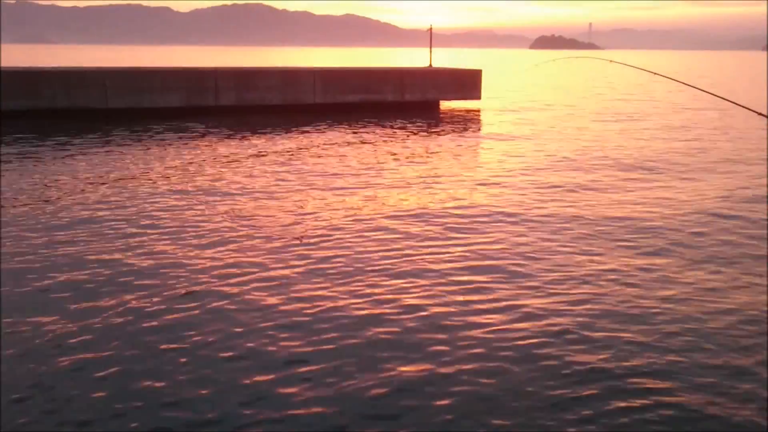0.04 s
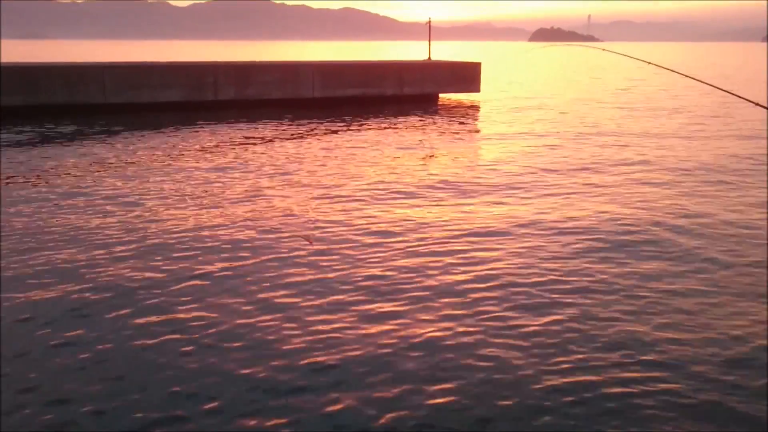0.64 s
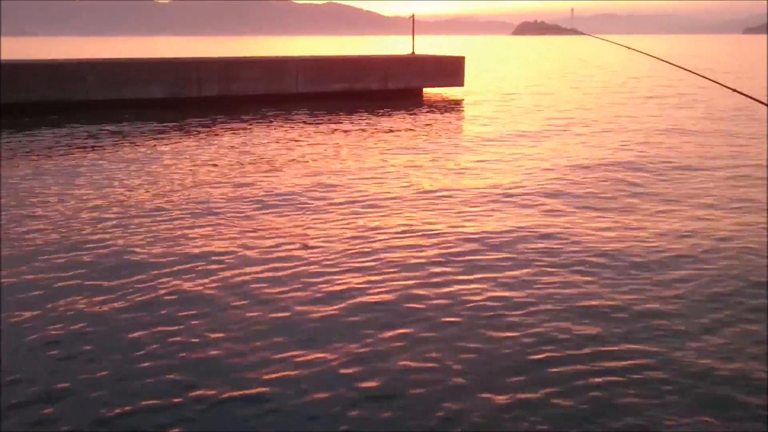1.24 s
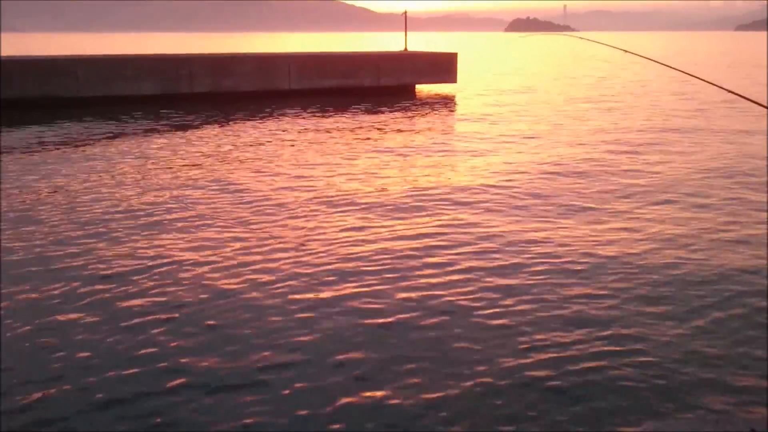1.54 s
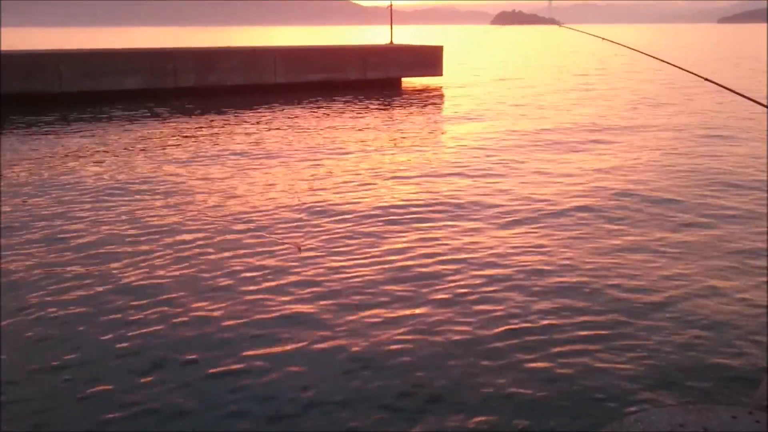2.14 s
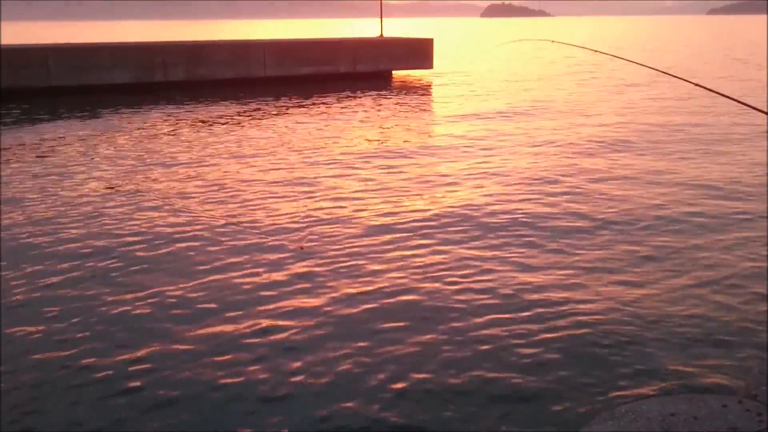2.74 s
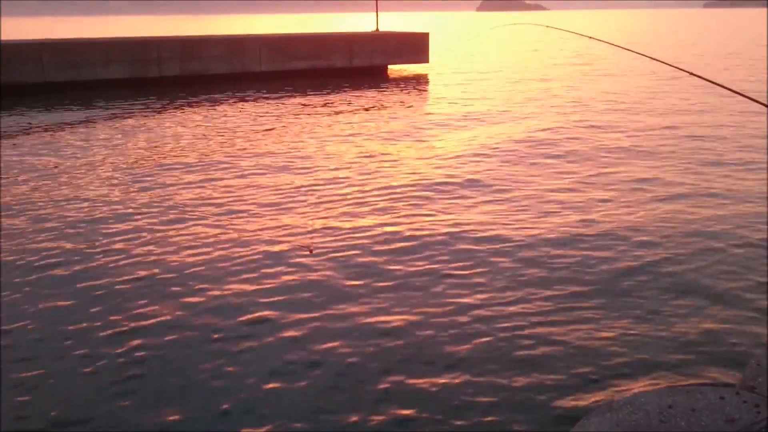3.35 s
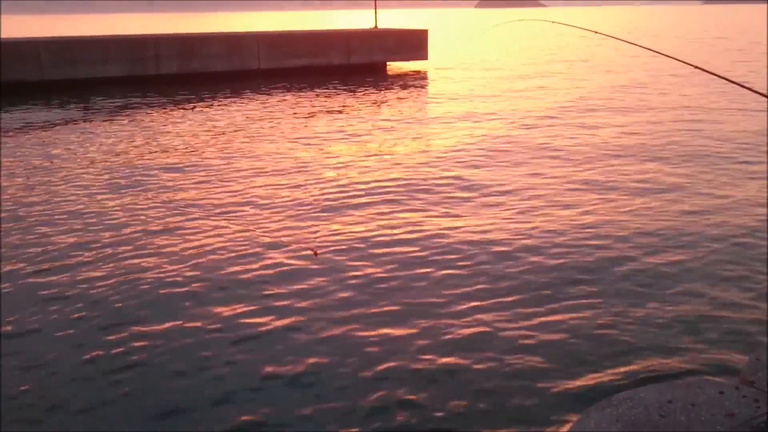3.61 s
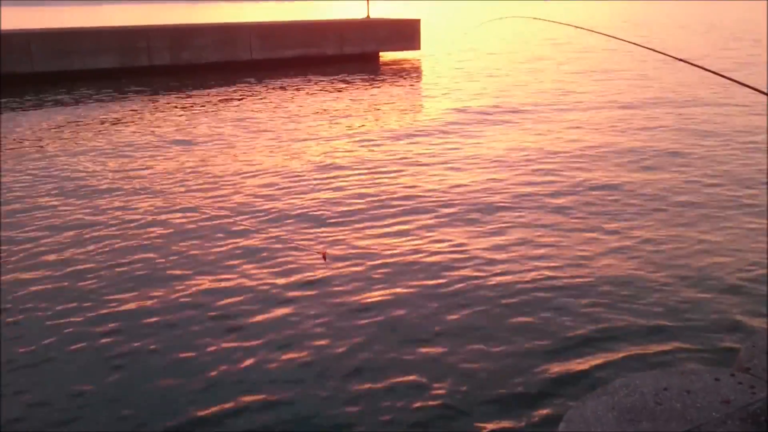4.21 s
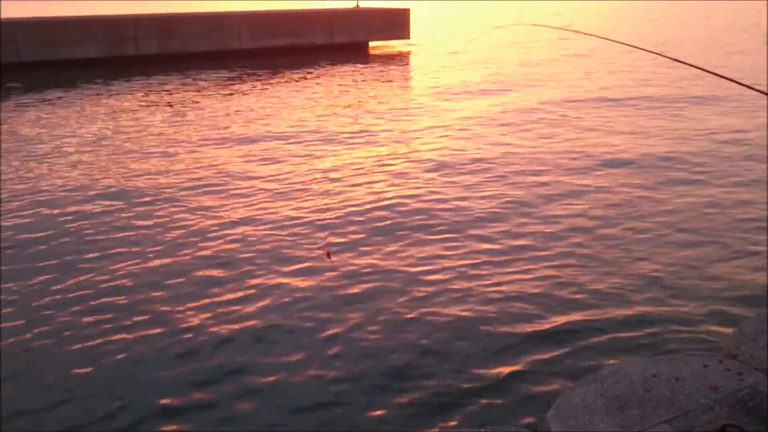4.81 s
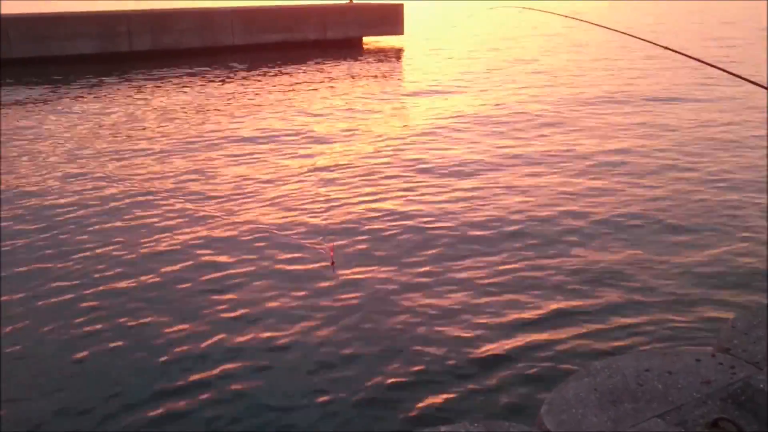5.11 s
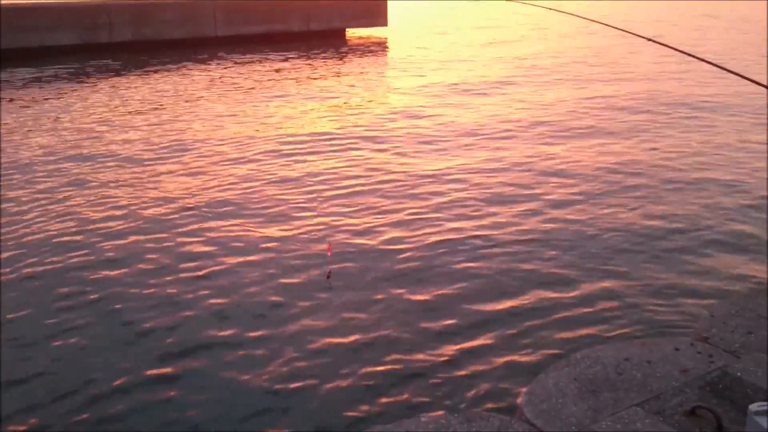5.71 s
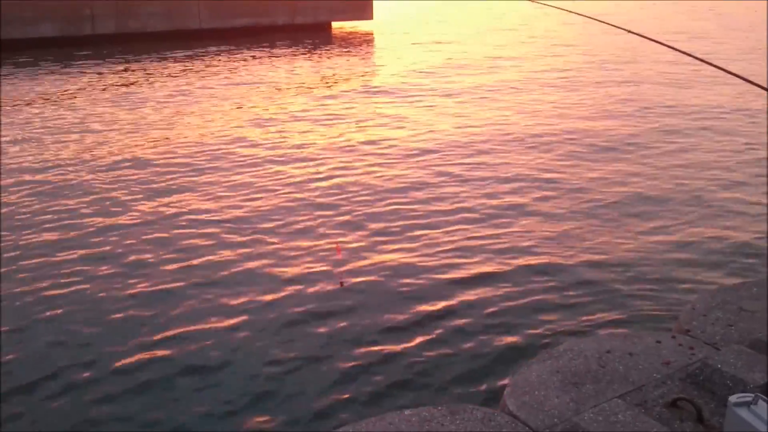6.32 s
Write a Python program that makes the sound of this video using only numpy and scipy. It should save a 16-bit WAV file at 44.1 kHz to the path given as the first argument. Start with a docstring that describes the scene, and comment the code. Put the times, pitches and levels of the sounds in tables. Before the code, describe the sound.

Close to the microphone, gentle waves slosh against a harbour wall in uneven bursts, throwing fine spray and leaving bubbly gurgles and single plops. The splashing swells at the start, eases, returns lightly, peaks a little past the middle and then calms. Underneath lie a soft harbour hush and low gusts on the microphone, while a distant engine and a few bird chirps are barely audible.

```python
"""Small waves lap against a concrete seawall: each lap traps a cloud of gulping bubbles and throws spray.
The water fizzes as it runs up the wall and gurgles a moment later as it drains, with single plops
and spits of droplets. Bubbles are damped, rising tones; spray and fizz are tiny ones over hiss.
Behind lie the hush of the harbour, the hum of a far engine, a few faint bird calls
and a low, gusting rumble, like wind on the microphone."""
import sys
import numpy as np
from scipy import signal
from scipy.fft import rfft, irfft, next_fast_len
from scipy.io import wavfile
from scipy.ndimage import uniform_filter1d, map_coordinates

SR = 44100
rng = np.random.default_rng(int(sys.argv[2]) if len(sys.argv) > 2 else 0)


def transcribe(signal):
    """Save signal, clipped to [-1, 1], as a 16-bit WAV file at the path in sys.argv[1]."""
    frames = np.atleast_2d(signal).T
    limited = np.clip(frames, -1, 1)
    pcm = np.round(limited * 32767).astype(np.int16)
    wavfile.write(sys.argv[1], SR, pcm)


N = 289296
DRAIN_LAG_S = 0.049  # the gurgle and the stray bubbles trail the fizz


def amp(db):
    return 10 ** (np.asarray(db) / 20)


def unit(x):
    """x at rms 1."""
    return x / np.sqrt(np.mean(x ** 2) + 1e-20)


def along(points, hz):
    """Read a curve of (f/Hz, value) points on a log frequency axis."""
    f, value = np.transpose(points)
    return np.interp(np.log(hz + 1), np.log(f + 1), value)


def wobble(rate):
    """A smooth random curve, rate knots a second."""
    knots = rng.standard_normal(int(N * rate / SR) + 4)
    return map_coordinates(knots, [np.arange(N) * rate / SR])


def filtered(x, response):
    """x through an EQ whose gain is response(hz)."""
    n = x.shape[-1]
    padded = next_fast_len(n + 4096)
    return irfft(rfft(x, padded) * response(np.fft.rfftfreq(padded, 1 / SR)), padded)[..., :n]


def coloured(x, spectrum):
    """x shaped by an EQ curve of (f/Hz, level/dB) points, at rms 1."""
    return unit(filtered(x, lambda hz: amp(along(spectrum, hz))))


def flow(lag_s):
    """How much water ran along the wall lag_s ago, in dB above the usual."""
    # swell and ebb of the water: t/s, level/dB
    tide = [(0, -55), (.51, -56.5), (.78, -52), (1.15, -60.5), (1.35, -66), (1.97, -63.5), (2.12, -60),
            (2.67, -58.5), (3.09, -67.5), (3.32, -60.5), (3.49, -59.5), (4.27, -53.5), (4.57, -53),
            (4.73, -56.5), (4.92, -65), (5.55, -64), (5.9, -61), (6.56, -62.5)]
    usual_db = -58
    return np.interp(np.arange(N) / SR - lag_s, *np.transpose(tide)) - usual_db


def burst(peak_s, rise, decay):
    """The samples around peak_s and an envelope that swells to its peak there, then dies away."""
    span = slice(max(int((peak_s - .15) * SR), 0), min(int((peak_s + .25) * SR), N))
    age = np.arange(span.start, span.stop) / SR - peak_s
    return span, np.where(age < 0, np.exp(-(age / rise) ** 2), np.exp(-np.abs(age) / decay))


def ring(t, hz, decay, glide):
    """A bubble as a complex damped tone with a soft attack; its pitch climbs as it nears the surface."""
    age = t / decay
    attack = 1 - np.exp(-(hz * t) ** 2)
    return attack * np.exp(2j * np.pi * hz * t * (1 + glide * age / 2) - age)


def bubbles(n, low_hz, high_hz, cycles, spread_db, count, size):
    """Bubble grains of size samples scattered over n samples, phase differing left to right; rms 1."""
    when, pitch, life, strength, phase = rng.random((count, 5)).T[:, :, None]
    hz = low_hz * (high_hz / low_hz) ** pitch
    decay = np.minimum(cycles * (.5 + life) / hz, size / SR / 4)
    gain = amp(-spread_db * np.log(0.17 + strength)) / np.sqrt(decay)
    tones = gain * ring(np.arange(size) / SR, hz, decay, glide=0.051)
    at = ((when * n).astype(int) + np.arange(size)) % n
    pair = [tones.imag, (tones * np.exp(2j * np.pi * phase)).imag]
    return unit(np.array([np.bincount(at.ravel(), channel.ravel(), n) for channel in pair]))


def patchy(x, patch_db, seconds, bins):
    """Bubbles of like size burst together: pitch regions a few bins wide swell and fade; rms 1."""
    spectra = signal.stft(x, nperseg=512)[2]
    frames = max(int(seconds * SR / 256), 2)
    patches = uniform_filter1d(rng.standard_normal(spectra.shape[1:]), bins, axis=0)
    patches = uniform_filter1d(patches, frames, axis=1)
    patches = uniform_filter1d(patches, 3, axis=0)
    return unit(signal.istft(spectra * amp(patch_db * unit(patches)), nperseg=512)[1][:, :N])


def crackle(spectrum, hiss_db, count):
    """Tiny ringing bubbles and droplets in clumps over a smooth hiss; rms 1."""
    pops = bubbles(N, 1100, 7000, cycles=5.9, spread_db=2.6, count=count, size=400)
    pops = unit(filtered(pops, np.sqrt))  # equal power per Hz
    froth = pops + amp(hiss_db) * rng.standard_normal((2, N))
    return coloured(patchy(froth, patch_db=2.8, seconds=.025, bins=7), spectrum)


def wall(x):
    """The concrete scatters a short, diffuse reflection."""
    # reverb time of the wall: f/Hz, t60/s
    t60 = [(200, 0.15), (2000, 0.22), (10000, 0.18)]
    hz, t, spectra = signal.stft(rng.standard_normal((2, SR // 3)), SR, nperseg=256)
    tail = signal.istft(spectra * amp(-60 * t / along(t60, hz)[:, None]), SR, nperseg=256)[1]
    return signal.fftconvolve(x, tail / np.linalg.norm(tail[0]), axes=1)[:, :N]


def splashes():
    """Wavelets collapse on the wall: air pockets gulp and spray flies, the finer the more water runs."""
    # wavelets: peak t/s, rise/s, gulp f/Hz, gulp level/dB, spray offset/dB
    laps = [(.02, 0.039, 2420, -57, 2.5), (.185, 0.0099, 930, -44.5, -11), (.254, 0.038, 516, -53, 3.5),
            (0.419, 0.003, 556, -49.5, 2), (.581, 0.0091, 1450, -36.5, -1), (0.643, 0.022, 1300, -43.5, 5),
            (.714, 0.005, 976, -46.5, 8.5), (.743, 0.0093, 2200, -41, 2.5), (.801, 0.033, 770, -48, 4),
            (.98, 0.028, 840, -48.5, -2), (2.025, 0.016, 540, -57.5, 7), (2.153, 0.022, 616, -49.5, -5.5),
            (2.299, 0.007, 1210, -46.5, -3.5), (2.439, .002, 850, -50, -12),
            (2.606, 0.0051, 1367, -49.5, 1.5), (2.681, 0.021, 2570, -49.5, 2.5),
            (2.744, 0.01, 500, -62, -7), (2.881, 0.02, 2310, -56.5, -1), (3.42, 0.031, 3050, -57.5, -1),
            (3.67, 0.097, 1750, -58, -1.5), (3.898, 0.0066, 2310, -48, -1), (3.976, 0.017, 488, -44, 2),
            (4.251, 0.0068, 690, -41.5, 2), (4.4, 0.043, 700, -47.5, 3.5),
            (4.488, 0.011, 1810, -41.5, -1.5), (4.541, 0.025, 656, -48, 2.5), (4.598, 0.012, 1059, -28, -4),
            (4.664, 0.012, 1350, -49.5, 6.5), (4.711, .0015, 2320, -42.5, -2),
            (4.801, .006, 1250, -52, -11), (5.237, 0.0035, 984, -53.5, -26), (6.01, 0.014, 552, -54.5, -1),
            (6.218, 0.024, 4470, -55, 1), (6.26, 0.029, 968, -55.5, -2), (6.532, 0.0087, 1203, -55.5, 6.5)]
    # spurts of fine droplets with no trapped air: peak t/s, length/s, level/dB
    spits = [(0.051, 0.015, -60), (0.25, .02, -55), (0.608, .015, -50.5), (0.714, 0.091, -54),
             (0.839, 0.023, -50.5), (1.005, 0.021, -58), (1.666, 0.0064, -56), (1.919, 0.028, -57.5),
             (2.455, .012, -61), (2.623, .015, -61), (2.744, .014, -57.5), (2.845, 0.0082, -53.5),
             (2.987, 0.0053, -59), (3.668, 0.048, -59.5), (4.421, 0.012, -47), (5.67, .015, -65.5),
             (5.772, 0.044, -60.5), (5.922, 0.049, -63.5), (6.098, 0.029, -59), (6.323, 0.033, -64)]
    # some pitches of the gulps ring stronger than others: f/Hz, level/dB
    gulp_eq = [(480, 1.5), (630, 1), (780, -3), (1050, 1), (1270, -0.5), (1650, -1.5), (2300, -1)]
    # tone of the coarse spray: f/Hz, level/dB
    spray_eq = [(100, 3), (250, 6.5), (500, -8), (1200, -1), (1700, -2), (2400, 0), (3200, 0), (4200, -4.5),
                (4850, -1), (5400, -11.5), (6400, -5), (8000, -30), (11000, -46), (16000, -47)]
    # tone of the mist, a patter of very fine droplets: f/Hz, level/dB
    mist_eq = [(300, -57), (3500, 12), (6500, 7), (9000, 2.5), (12000, -0.5), (14000, -5), (15700, 2)]
    usual_lap_db, decay_halves_db, mist_lag_s = -48, 19.5, 0.0052
    gulps, spray_power = np.zeros((2, N)), np.zeros(N)
    for peak_s, rise, hz, db, spray_db in laps:
        # slow laps linger, strong ones collapse faster
        decay = (0.022 + 0.35 * rise) * .5 ** ((db - usual_lap_db) / decay_halves_db)
        span, swell = burst(peak_s, rise, decay)
        cloud = bubbles(len(swell), hz / 1.35, hz * 1.35, cycles=7, spread_db=2.6, count=120, size=1200)
        strays = bubbles(len(swell), 442, 2786, cycles=5.2, spread_db=1.6, count=140, size=700)
        gulp = unit(swell * (cloud + amp(-2.5) * strays))
        gulps[:, span] += amp(db + 1.5) * np.sqrt(np.mean(swell ** 2)) * gulp
        spray_power[span] += (amp(db + spray_db) * swell) ** 2
    t = np.arange(N) / SR
    mist_power = np.interp(t - mist_lag_s, t, spray_power) * amp(-11 + 0.65 * flow(0)) ** 2
    for peak_s, length, db in spits:
        span, swell = burst(peak_s, rise=0.59 * length, decay=length)
        mist_power[span] += (amp(db) * swell) ** 2
        spray_power[span] += (amp(db + 1.5) * swell) ** 2
    gulps = filtered(gulps, lambda hz: amp(along(gulp_eq, hz)))
    spray = np.sqrt(spray_power) * crackle(spray_eq, hiss_db=2, count=8000)
    patter = rng.standard_normal((2, N)) * amp(1.5 * wobble(500) + .7 * wobble(60))
    mist = amp(5) * np.sqrt(mist_power) * coloured(patter, mist_eq)
    return gulps + spray + mist + churn(spray_power)


def churn(spray_power):
    """The thrown water falls back and stirs up big, deep bubbles that linger."""
    linger_s = 0.11
    pole = np.exp(-2 / (linger_s * SR))
    stirred = signal.lfilter([1 - pole], [1, -pole], spray_power)
    deep = bubbles(N, 241.7, 755, cycles=7.4, spread_db=3.6, count=1100, size=3000)
    return amp(-10) * np.sqrt(np.abs(stirred)) * deep


def wash():
    """Water fizzes up the wall and gurgles back in uneven little surges, the gurgle blurred by the wall."""
    # dark tone of the draining water: f/Hz, level/dB
    gurgle_eq = [(100, 6), (250, -5.5), (400, -5), (620, 0), (1200, -8), (2000, -11), (4000, -31)]
    # bright tone of the run-up: f/Hz, level/dB
    fizz_eq = [(300, -6), (1200, -5.5), (2200, -4), (3400, -0.5), (4100, -4.5), (4800, -9), (5400, -7.5),
               (6400, -8), (8000, -10), (11000, -17.5), (14000, -22.5), (16000, -19)]
    surge = wobble(22)
    pockets = bubbles(N, 217, 3060, cycles=5, spread_db=1.7, count=3200, size=1200)
    pockets = unit(filtered(pockets + amp(-2) * wall(pockets), np.sqrt))
    gurgle = coloured(pockets + amp(-3.5) * rng.standard_normal((2, N)), gurgle_eq)
    fizz = crackle(fizz_eq, hiss_db=6, count=7000)
    gurgle_db = -60 + 0.98 * flow(DRAIN_LAG_S) + 0.35 * surge
    fizz_db = -58 + 1.18 * flow(0) + 1.3 * surge
    return amp(gurgle_db) * gurgle + amp(fizz_db) * fizz


def plinks():
    """Stray bubbles ring above the wash, louder the more water drains."""
    strays = bubbles(N, 480, 3000, cycles=10, spread_db=3.2, count=260, size=2400)
    return amp(-67 + 0.77 * flow(DRAIN_LAG_S)) * strays


def harbour():
    """A bed of steady, far hush."""
    # tone of the hush: f/Hz, level/dB
    hush_eq = [(20, -12), (45, -12.5), (80, 0.5), (120, -8.5), (180, -18), (290, -23), (380, -18.5),
               (500, -28), (1000, -28.5), (3000, -22.5), (6500, -26.5), (10000, -35), (16000, -70)]
    return amp(-61 + wobble(2.3)) * coloured(rng.standard_normal((2, N)), hush_eq)


def rumble():
    """A low, gusting rumble, like wind on the microphone."""
    # rise and fall of the gusts: t/s, relative level/dB
    gusts = [(0.0, -59), (0.38, -69.5), (1.04, -61.5), (1.46, -71), (2.81, -68), (3.76, -78), (4.0, -61),
             (4.27, -70.5), (4.75, -57), (4.95, -70.5), (5.13, -63.5), (6.56, -73)]
    rumble_eq = [(20, -24), (38, -6.5), (62, -4.5), (115, -3.5), (200, -10), (500, -24), (2000, -52)]
    rumble_db = np.interp(np.arange(N) / SR, *np.transpose(gusts)) + 9.5
    return amp(rumble_db) * coloured(rng.standard_normal((2, N)), rumble_eq)


def engine():
    """A far engine throbs on a few low, slightly unsteady harmonics, left and right in opposite phase."""
    # engine harmonics: multiple of the turning rate, level/dB
    harmonics = [(2, -93), (3, -68), (4, -76), (5, -80), (6, -80)]
    turning_hz = 20.5
    turns = np.cumsum(turning_hz * (1 + .01 * wobble(4))) / SR
    hum = sum(amp(db + 2.5 * wobble(8)) * np.sin(2 * np.pi * k * turns) for k, db in harmonics)
    return np.array([hum, -hum])


def plops():
    """Single large bubbles ring out of the wash, the lower the longer."""
    # large bubbles: t/s, level/dB, f/Hz
    cues = [(.179, -44.5, 975), (.71, -25, 4700), (1.664, -39, 4920), (2.081, -45, 281),
            (2.165, -47.5, 570), (2.266, -39, 610), (2.292, -34, 2070), (2.296, -35, 618),
            (3.983, -30, 447), (4.596, -18.5, 1263), (5.234, -45, 1043), (5.315, -42.5, 706),
            (6.0, -49.5, 273), (6.229, -48, 287), (6.35, -48.5, 710)]
    decay_cycles = 8.3
    out, t = np.zeros((2, N + SR)), np.arange(SR // 6) / SR
    for (start_s, db, hz), quarter_turn in zip(cues, rng.choice([-1j, 1j], len(cues))):
        tone = amp(db) * ring(t, hz, decay_cycles / hz, glide=0.0086)
        out[:, round(start_s * SR):][:, :len(t)] += [tone.imag, (tone * quarter_turn).imag]
    return out[:, :N]


def birds():
    """Thin arched and falling whistles from far off; longer calls arch higher in the middle."""
    # bird calls: t/s, length/s, start f/Hz, end f/Hz
    calls = [(2.057, 0.15, 3200, 3360), (2.982, 0.12, 3110, 3270), (5.213, .038, 3450, 2680),
             (5.49, 0.026, 3660, 3050), (5.556, 0.032, 3600, 2980)]
    arch_hz_per_s = 2400
    out = np.zeros(N)
    for start_s, length, start_hz, end_hz in calls:
        progress = np.linspace(0, 1, int(length * SR))
        arch = np.abs(np.sin(np.pi * progress))
        hz = start_hz + (end_hz - start_hz) * progress + arch_hz_per_s * length * arch
        whistle = np.sqrt(arch) * np.sin(2 * np.pi * np.cumsum(hz) / SR)
        out[round(start_s * SR):][:len(whistle)] += amp(-61.5) * whistle
    return np.array([out, out])


def scene():
    """Splashes, plops and birds reflect off the wall, over the wash and the background beds."""
    direct = splashes() + plops() + birds()
    return direct + amp(-10) * wall(direct) + wash() + plinks() + harbour() + rumble() + engine()


def record(dry):
    """A close stereo pair, widened in the bass, each side with its own colour, and a high cut."""
    # stereo width, the bass mostly in opposite phase: f/Hz, left-right correlation given to diffuse sound
    likeness = [(60, -0.86), (150, -0.91), (300, -0.67), (620, -0.66), (1000, -0.048), (1500, 0.2),
                (3000, -0.1), (15000, 0.027)]
    # colour of the left channel over the right: f/Hz, level/dB
    balance = [(100, -1), (300, 1.5), (650, 4), (1400, 3.5), (2200, 2.6), (4000, 2.5), (4850, 7.5),
               (5700, -4), (7500, -1), (11500, 0.5), (15500, 7)]
    balance_share, high_cut_hz = np.array([[.6], [-.4]]), 15850
    mid = filtered(dry[0] + dry[1], lambda hz: np.sqrt(1 + along(likeness, hz))) / 2
    side = filtered(dry[0] - dry[1], lambda hz: np.sqrt(1 - along(likeness, hz))) / 2
    pair = np.array([mid + side, mid - side])
    pair = filtered(pair, lambda hz: amp(along(balance, hz) * balance_share))
    return filtered(pair, lambda hz: hz < high_cut_hz)


dry = scene()
out = record(dry)
transcribe(out)
```